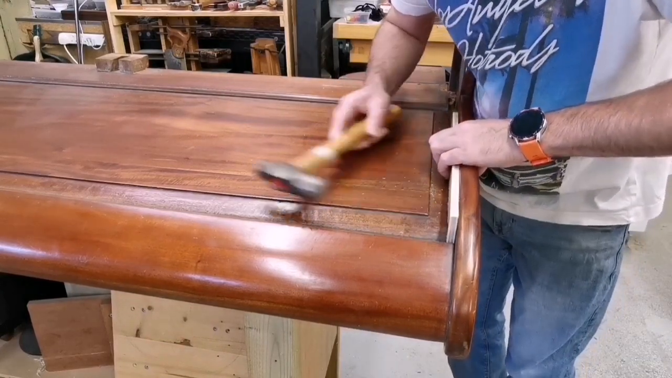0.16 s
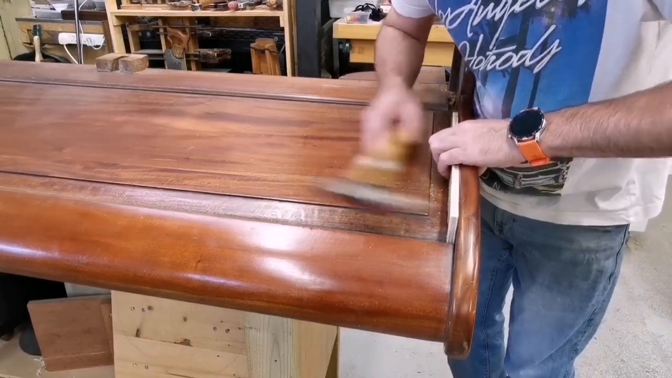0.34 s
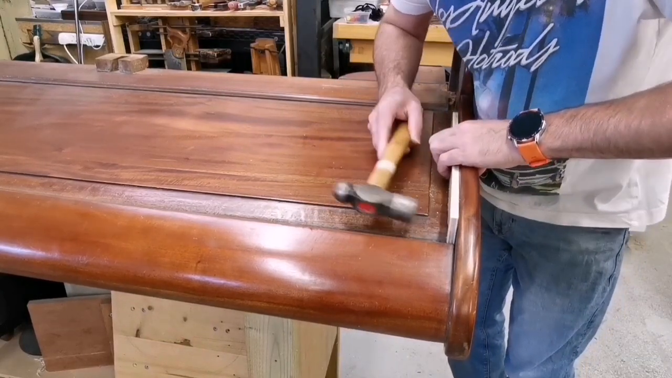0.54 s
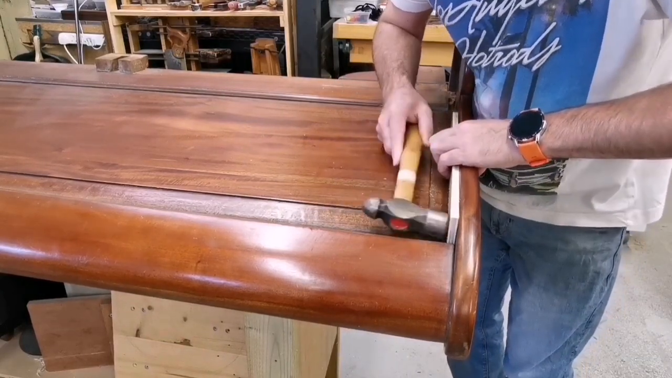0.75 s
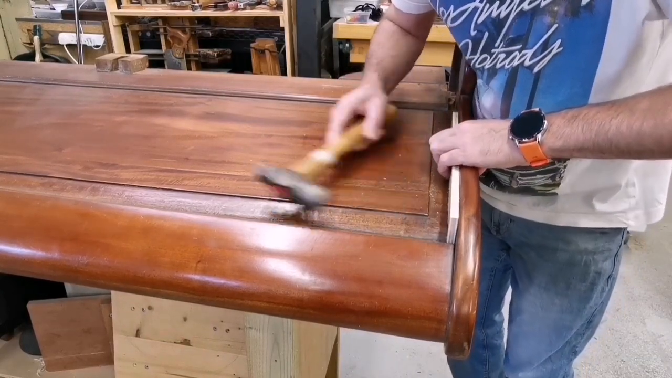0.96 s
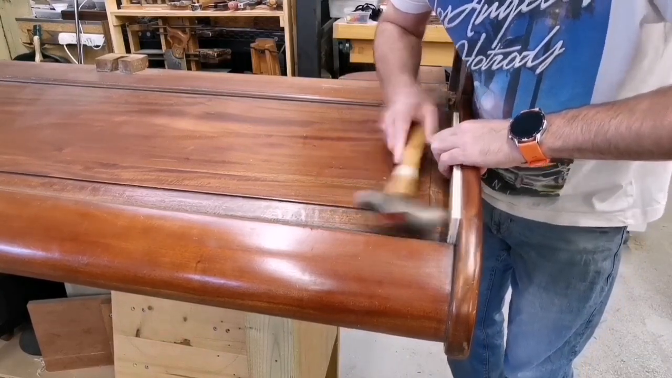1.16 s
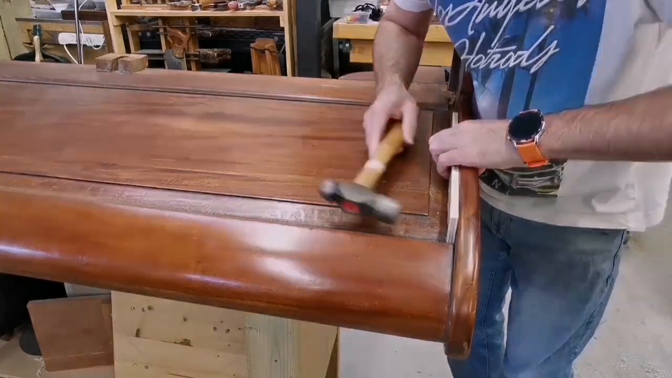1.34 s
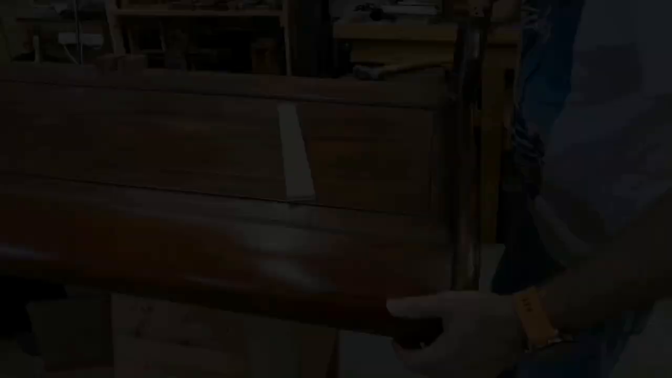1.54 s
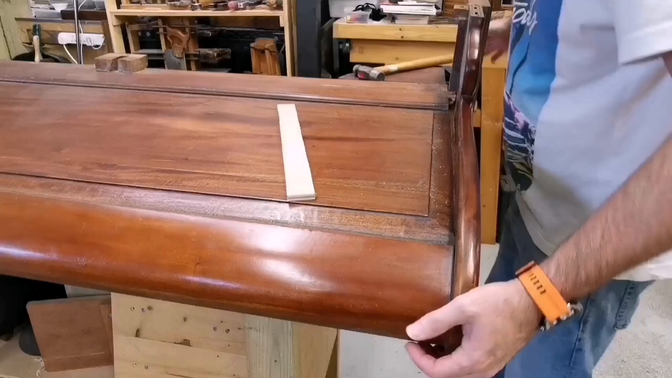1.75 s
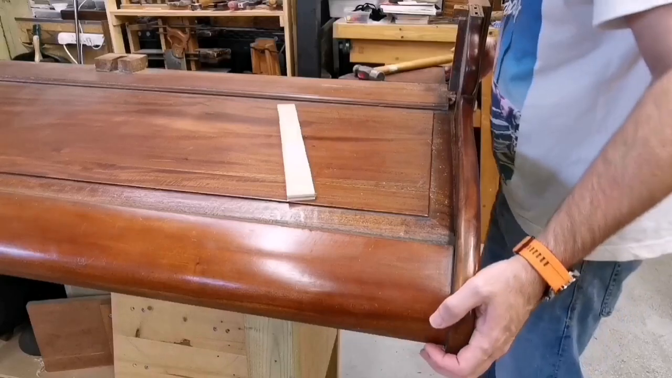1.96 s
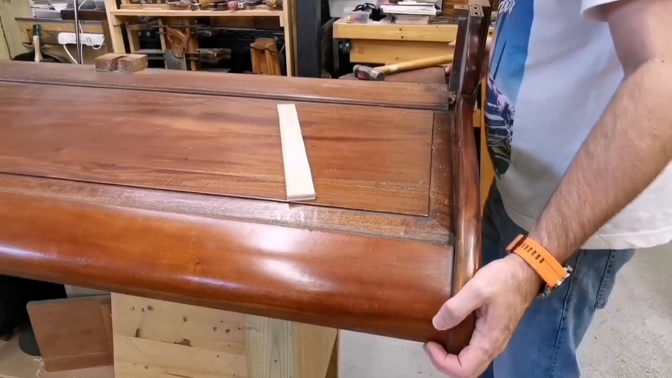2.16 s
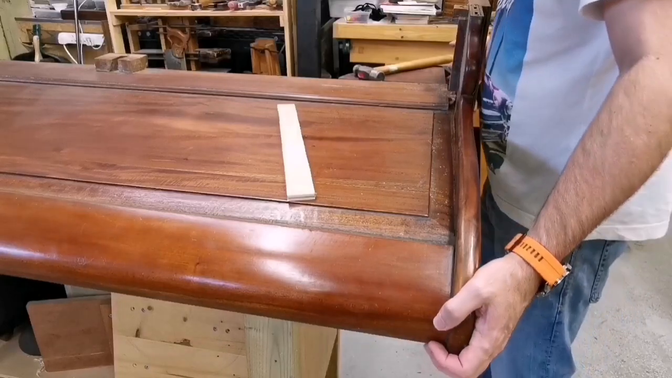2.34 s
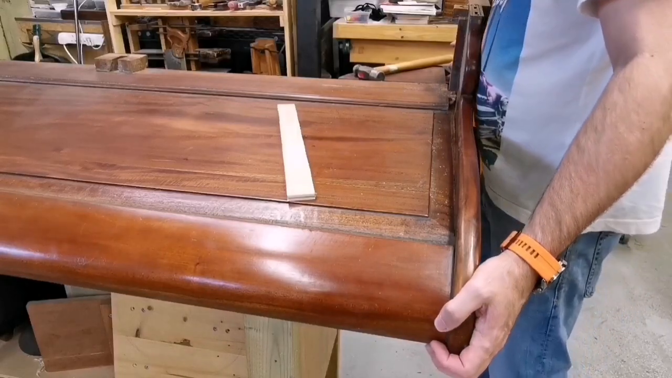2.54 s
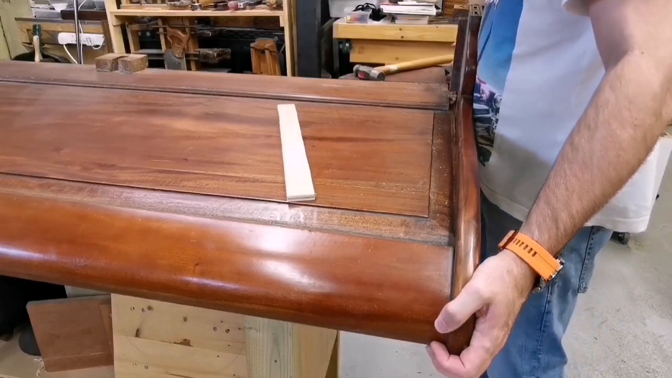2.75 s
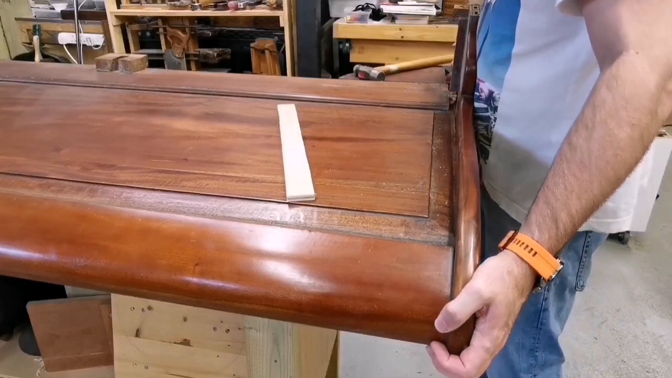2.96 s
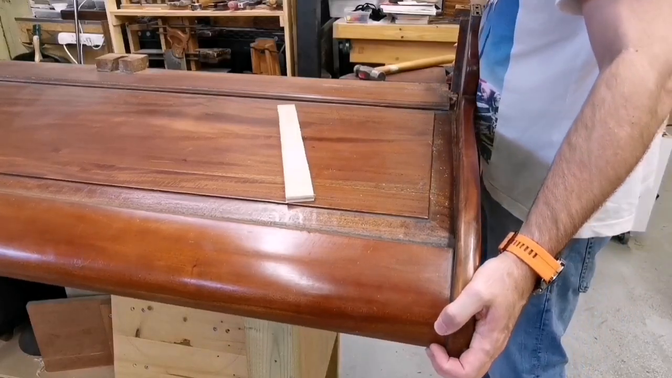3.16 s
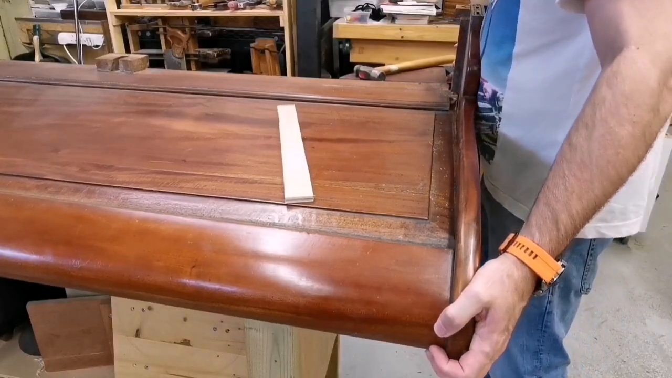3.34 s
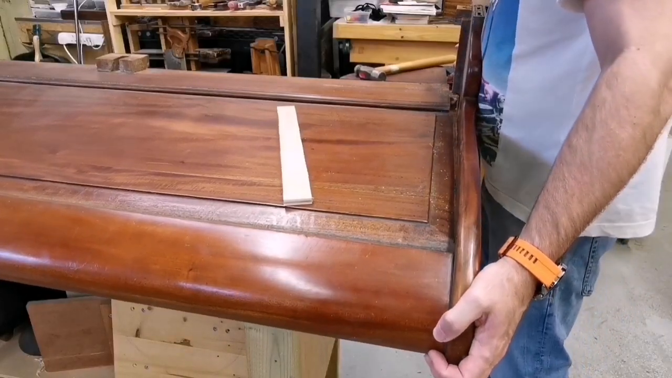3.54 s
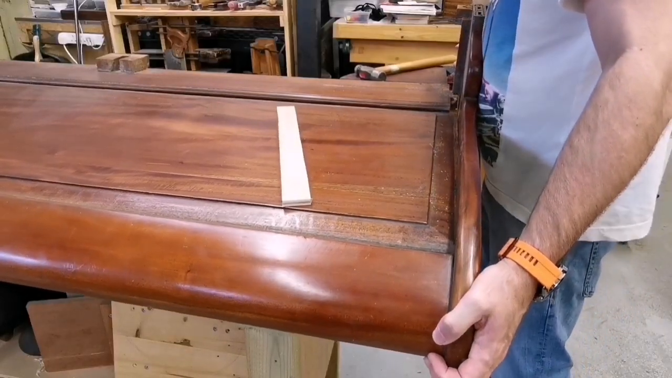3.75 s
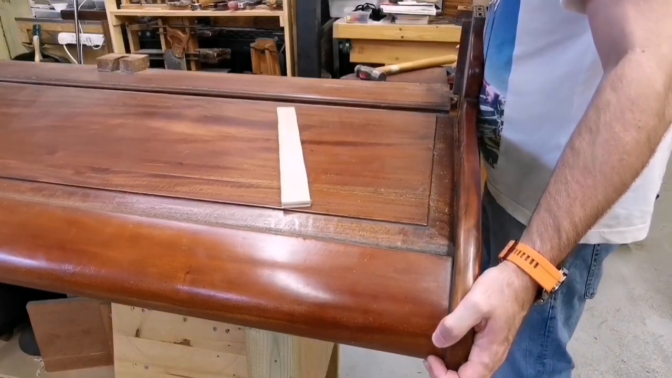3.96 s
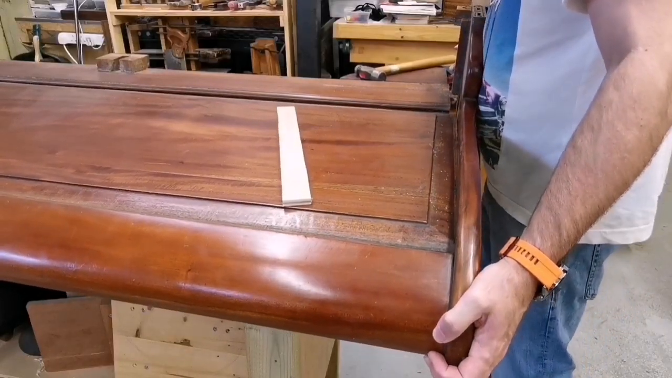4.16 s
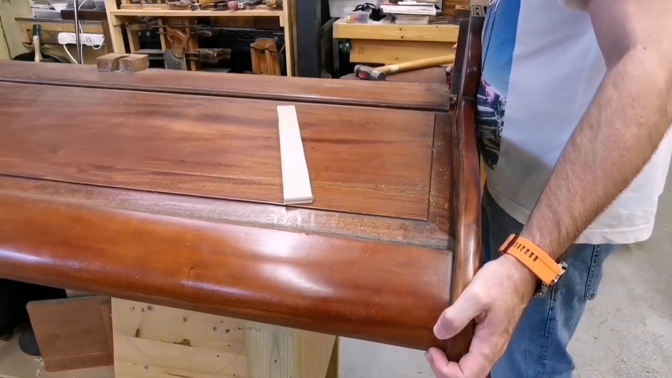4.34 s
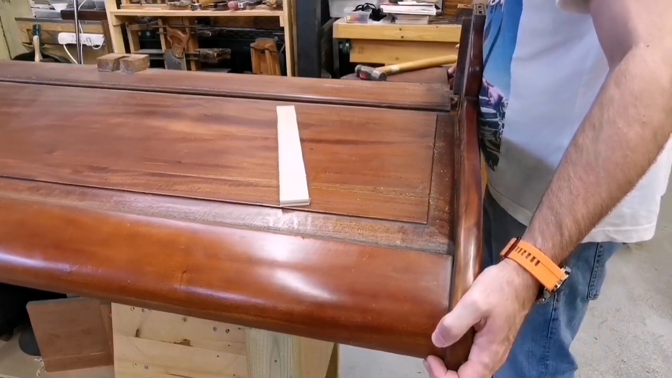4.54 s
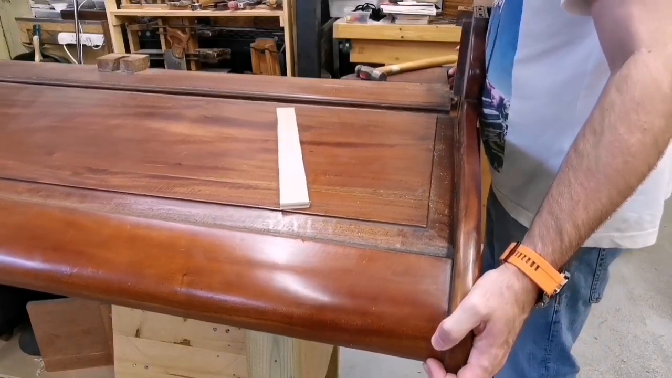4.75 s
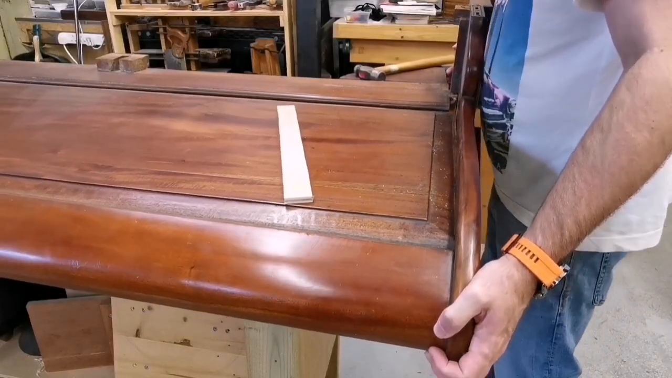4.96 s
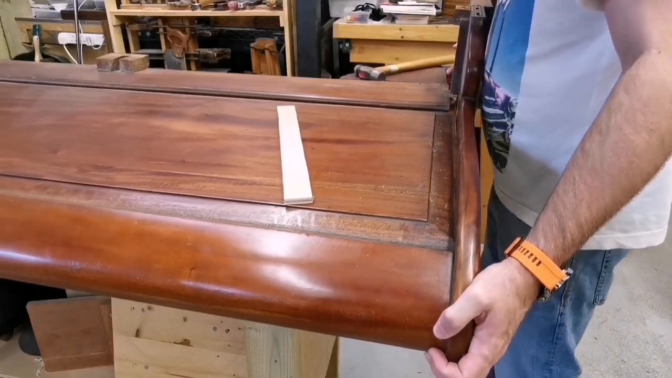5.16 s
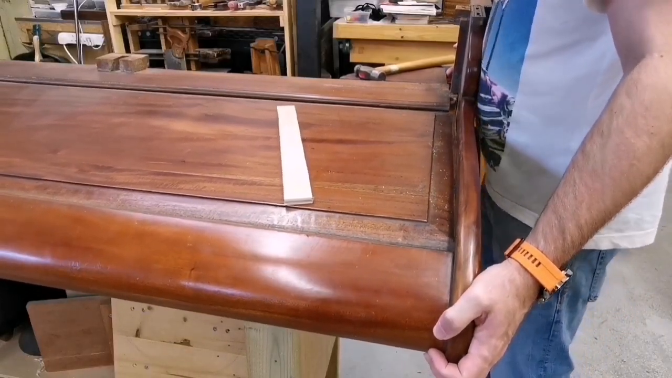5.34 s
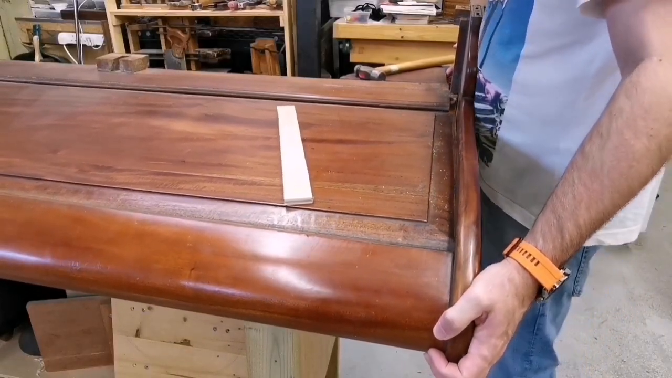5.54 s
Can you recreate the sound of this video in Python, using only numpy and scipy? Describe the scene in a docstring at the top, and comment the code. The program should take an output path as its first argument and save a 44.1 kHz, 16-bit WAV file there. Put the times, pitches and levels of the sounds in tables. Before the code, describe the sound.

In a hard-walled workshop, a steel hammer hits a wooden bed end in loud, cracking blows with quick bounces, rattle and low boom. The sound cuts out briefly, then returns much quieter: low rumble, hand rubbing and shuffling on wood, small clicks, and dull knocks from the joint that grow denser and louder toward the end. Close stereo microphone, with loud hits squashed by limiting.

```python
"""Hard hammer blows with bounces ring out first: steel on a wooden bed end, in a hard-walled workshop.
Each blow rings the wood, cracks, rattles and booms the bed; a limiter ducks the loud sound.
The sound cuts out, then resumes closer to the room's rumble. A hand rubs and grips the wood, made from
tiny clicks and soft noise, among dull knocks of the slipping joint and bright clicks, scrapes and cracks."""
import sys
import numpy as np
from scipy import signal
from scipy.fft import rfft, irfft, next_fast_len
from scipy.io import wavfile
from scipy.ndimage import uniform_filter1d, minimum_filter1d, map_coordinates

SR = 44100
rng = np.random.default_rng(int(sys.argv[2]) if len(sys.argv) > 2 else 0)


def bounce(signal):
    """Save signal as a 16-bit WAV file at the path given by the first command-line argument."""
    frames = np.transpose(np.atleast_2d(signal))
    limited = np.clip(frames, -1, 1)
    pcm = np.round(limited * 32767).astype(np.int16)
    wavfile.write(sys.argv[1], SR, pcm)


N = 246959
T = np.arange(N) / SR
PRE = SR // 4  # samples of run-up, so a blow just before time zero can still ring
CUT_S = 1.697  # hammering before this time, handwork after it


def from_db(db):
    """Turn decibels into a gain."""
    return 10 ** (np.asarray(db) / 20)


def rms_one(x):
    """Scale a sound to rms 1."""
    return x / np.sqrt(np.mean(x ** 2) + 1e-20)


def curve(rows):
    """Read a (time_s, value) table at every sample."""
    return np.interp(T, *np.transpose(rows))


def at_hz(points, hz):
    """Read a (pitch_hz, value) table on a log-pitch axis."""
    table_hz, values = np.array(points).T
    return np.interp(np.log(hz + 1), np.log(table_hz), values)


def colour(x, gain):
    """Filter a sound by a gain given as a function of pitch in Hz."""
    size = next_fast_len(x.shape[-1] + 4096)
    spectrum = rfft(x, size) * gain(np.fft.rfftfreq(size, 1 / SR))
    return irfft(spectrum, size)[..., :x.shape[-1]]


def stereo_noise(size, alike):
    """White noise whose two sides are as alike at each pitch as the table says."""
    mid, side = rng.standard_normal((2, size))
    mid = colour(mid, lambda hz: np.sqrt(1 + np.clip(at_hz(alike, hz), -1, 1)))
    side = colour(side, lambda hz: np.sqrt(1 - np.clip(at_hz(alike, hz), -1, 1)))
    return np.array([mid + side, mid - side]) / np.sqrt(2)


def uneven(size, step, depth_db, top):
    """A gain that jumps at random every few samples; top limits the upward jumps."""
    jumps = np.clip(rng.standard_normal(size // step), -3, top)
    return np.repeat(from_db(depth_db * jumps), step)


def patchy(x, depth_db):
    """Make the colour vary in small patches of pitch and time, fully above 1 kHz and less below."""
    patch_hz, patch_s = 300, .025
    f, t, z = signal.stft(x, SR, nperseg=512)
    coarse = rng.standard_normal((int(f[-1] / patch_hz) + 2, int(t[-1] / patch_s) + 2))
    places = np.meshgrid(f / patch_hz, t / patch_s, indexing="ij")
    field = map_coordinates(coarse, places, order=1)
    gain = from_db(depth_db * field * np.clip(f / 1000, 0, 1)[:, None])
    return signal.istft(z * gain, SR, nperseg=512)[1][..., :x.shape[-1]]


# how alike the two sides of the air noise are: pitch_hz, likeness (-1 to 1)
AIR_ALIKE = [(60, 0.77), (130, 0.96), (290, 0.85), (640, 0.00043), (1410, -0.27), (3100, -0.81), (6820, 1),
             (15000, -0.0096)]


def air(spectrum, level_db):
    """Spread-out noise of a given colour and rms level."""
    noise = stereo_noise(N, AIR_ALIKE)
    return from_db(level_db) * rms_one(colour(noise, lambda f: from_db(at_hz(spectrum, f))))


# colour of the air during the hammering: pitch_hz, relative_level_db (per Hz)
HAMMERING_AIR = [(15, -47.5), (25, 27), (249, 7.5), (317, 9.5), (503, -35), (775, -20.5), (1130, -38.5),
                 (1890, 1.5), (2910, -8.5), (3920, -3), (8590, -13), (9320, -19), (16000, -15)]


def hammering_air():
    """Quiet, steady background noise under the blows."""
    return air(HAMMERING_AIR, level_db=-64.5)


# colour of the air during the handwork: pitch_hz, relative_level_db (per Hz)
HANDWORK_AIR = [(20, -43), (40, -3), (70, -5.5), (125, -16), (200, -17.5), (350, -22), (600, -24.5),
                (1000, -32.5), (2000, -33), (2600, -32.5), (3500, -38), (5000, -38.5), (6500, -39.5),
                (9000, -45.5), (11000, -40), (16000, -48.5)]


def handwork_air():
    """Background noise under the handwork, its colour shifting in small patches."""
    return patchy(air(HANDWORK_AIR, level_db=-61), depth_db=2.0)


def narrow(hz, width_hz):
    """Noise in a narrow resonance: a wavering tone, rms 1."""
    noise = rng.standard_normal(N)
    return rms_one(colour(noise, lambda f: 1 / (1 + (2 * (f - hz) / width_hz) ** 2)))


def wavering(hz, width_hz, steady):
    """A steady tone with narrow noise about it, rms 1."""
    tone = np.sin(2 * np.pi * hz * T + rng.uniform(0, 2 * np.pi))
    return rms_one(steady * tone + narrow(hz, width_hz))


# machine tones: pitch_hz, width_hz, level_db (before the tilt to the left)
HUM = [(98.7, 6.1, -64.5), (157, 5, -68), (318, 10, -74)]
# how the low rumble comes and goes: time_s, level_db (before the tilt to the left)
RUMBLE = [(1.7, -44), (1.73, -48), (2.08, -47), (2.19, -56), (2.65, -58.5), (2.74, -74), (3.1, -46),
          (3.4, -78), (3.53, -53.5), (4.36, -58), (4.41, -74), (4.5, -50), (4.68, -77), (4.98, -48),
          (5.14, -71), (5.18, -47), (5.54, -59), (5.6, -103)]


def machines():
    """A wavering rumble and hum from plant outside the room, stronger on the left."""
    rumble_hz, rumble_width_hz = 47, 5
    hum = sum(from_db(level_db) * wavering(hz, width_hz, steady=2.54) for hz, width_hz, level_db in HUM)
    rumble = from_db(curve(RUMBLE)) * wavering(rumble_hz, rumble_width_hz, steady=1.64)
    tilted = (hum + rumble) * from_db([[.9], [-.9]])
    # a fainter, wider part pushes opposite ways on the two sides
    opposed = from_db(curve(RUMBLE) - 25) * narrow(rumble_hz, 23.0) * [[1], [-1]]
    return tilted + opposed


# likeness of the room's two sides: pitch_hz, likeness (-1 to 1)
ROOM_ALIKE = [(60, 0.55), (130, 0.97), (290, 0.86), (640, 0.47), (1410, -0.47), (3100, 0.42), (6820, 0.81),
              (15000, -0.94)]
# time the room takes to fall 60 dB: pitch_hz, fade60_s
ROOM_T60 = [(80, 0.55), (250, 0.69), (600, 0.59), (1500, 0.74), (4000, 0.78), (8000, 0.51), (15000, 0.21)]
# colour of the room's tail: pitch_hz, relative_level_db
ROOM_COLOUR = [(60, -6), (150, 8.5), (300, 2), (700, 3), (1500, -1.5), (4000, -5), (8000, -15), (15000, -3)]


def workshop(x, room_db):
    """Direct sound plus a spread-out room tail that builds up and dies band by band."""
    build_s = 0.0011
    t = np.arange(SR) / SR
    white = [stereo_noise(SR, ROOM_ALIKE) for _ in range(2)]
    edges = 40 * 2 ** np.arange(0, 9.1, .5)
    tail = 0
    for k, (low, high) in enumerate(zip(edges, edges[1:])):
        hz = np.sqrt(low * high)
        half_octave = signal.butter(2, [low, high], "band", fs=SR, output="sos")
        band = signal.sosfilt(half_octave, white[k % 2])  # neighbouring bands are unrelated
        tail = tail + band * from_db(at_hz(ROOM_COLOUR, hz) - 60 * t / at_hz(ROOM_T60, hz))
    tail = tail * (1 - np.exp(-t / build_s))
    tail = from_db(room_db) * tail / np.sqrt(np.mean(np.sum(tail ** 2, axis=1)))
    echo = signal.fftconvolve(x.mean(axis=0)[None], tail, axes=1)[:, :N + PRE]
    return (x + patchy(echo, depth_db=3.0))[:, PRE:]


# thin panel of the bed end, colouring every crack and rub:
# pitch_hz, width_hz, level_db (over the direct sound)
PANEL = [(1166, 320, -5.5), (1576, 230, -6), (1835, 210, -1), (2157, 360, 3.5), (2447, 300, -0.5),
         (2890, 76, 0), (3400, 90, -9.5), (4165, 120, 0), (4840, 80, -2), (5725, 200, -0.5), (6280, 86, -2),
         (6770, 420, 2.5), (7260, 150, 1.5), (7940, 250, 1), (8730, 270, 2.5), (9280, 160, 5),
         (10600, 85, 7), (11500, 130, 5.5)]


def panel(f, detune):
    """Direct sound plus the panel's resonances; each contact may meet slightly shifted pitches."""
    hz, width_hz, level_db = np.array(PANEL).T[:, :, None]
    hz = hz * (1 + detune * rng.standard_normal(hz.shape))
    return 1 + np.sum(from_db(level_db) / (1 + 2j * (f - hz) / width_hz), axis=0)


# hand and body moving against the bed; rise and fall each span 20 dB:
# peak_s, skin_and_cloth_rub_db, dull_shuffle_db, rise_s, fall_s, wood_scrape_db
STROKES = [(1.76, -82, -55.5, 0.27, 0.6, -76.5), (1.924, -65.5, -63.5, 0.061, 0.16, -78),
           (2.181, -74, -66.5, 0.37, 0.2, -82.5), (2.29, -75, -62.5, 0.064, 0.071, -71),
           (2.415, -69, -72, 0.035, 0.085, -66.5), (2.459, -72, -68, 0.055, 0.078, -70),
           (2.785, -72, -59.5, 0.042, 0.16, -70.5), (2.965, -76, -71, 0.036, 0.087, -81),
           (3.01, -61, -58.5, 0.055, 0.059, -60), (3.03, -67, -60.5, 0.022, 0.077, -83),
           (3.14, -75, -70, 0.076, 0.19, -84), (3.3, -74.5, -62, 0.022, 0.15, -78),
           (3.375, -78, -68, 0.055, 0.066, -77), (3.414, -61.5, -71, 0.11, 0.14, -61.5),
           (3.645, -65, -66, 0.041, 0.076, -65), (3.679, -58, -60.5, 0.052, 0.07, -64),
           (3.71, -69, -61.5, .03, 0.082, -75), (3.869, -75, -78, 0.026, 0.051, -82),
           (3.95, -79, -68.5, 0.026, 0.29, -78), (4.077, -67, -90, 0.054, 0.052, -76),
           (4.154, -73.5, -82, 0.056, 0.058, -78), (4.429, -60, -56.5, 0.075, 0.035, -65),
           (4.57, -89, -51.5, 0.04, 0.13, -85), (4.65, -82, -52, 0.073, 0.081, -79),
           (4.74, -78, -56.5, 0.036, 0.29, -87), (4.96, -81, -57, 0.074, 0.34, -77),
           (5.029, -71, -48, 0.072, 0.45, -72), (4.84, -70, -61, 0.13, 0.11, -73),
           (5.36, -73.5, -77, 0.39, 1, -75)]


def strokes(column):
    """Each stroke swells to its peak and dies away, evenly in dB."""
    total = 0
    for row in STROKES:
        peak_s, rise_s, fall_s = row[0], row[3], row[4]
        away = np.maximum((peak_s - T) / rise_s, (T - peak_s) / fall_s)
        total = total + from_db(row[column] - 20 * away)
    return total


# colour of the dull shuffle: pitch_hz, relative_level_db (per Hz)
SHUFFLE_COLOUR = [(150, -2.5), (300, -1.5), (550, -4.5), (1000, -8), (2200, -24), (4000, -48)]


def shuffling():
    """Hand and body shuffle dully: soft noise that swells with each stroke."""
    return strokes(column=2) * air(SHUFFLE_COLOUR, level_db=0)


# colour of the rubbing before the panel: pitch_hz, relative_level_db (per Hz)
RUB_COLOUR = [(500, -10), (1200, -7.5), (2100, -4), (3700, 2), (5000, 5.5), (6700, 4.5), (9000, -5.5),
              (12000, -14.5), (16000, -5)]


def rubbing(per_s, lump_db):
    """Skin, cloth and wood catch in dense small clicks that come in lumps and sound through the panel."""
    split_hz = 3600
    out = 0
    for column, slope in [(1, -6), (5, 6)]:  # skin and cloth above the split, wood scrape below
        lumps = np.repeat(from_db(lump_db * rng.standard_normal(N // 150 + 1)), 150)[:N]
        grains = (rng.random(N) < per_s / SR) * rng.standard_normal(N) * lumps
        grains = colour(grains, lambda f: from_db(at_hz(RUB_COLOUR, f)) * panel(f, detune=0)
                        / (1 + ((f + 1) / split_hz) ** slope))
        out = out + rms_one(patchy(grains, depth_db=5.0)) * strokes(column=column)
    return np.pad(out, (PRE, 0))


# ringing tones of the bed end: pitch_hz, hammer_level_db, handwork_level_db,
# fade60_s (before ring length)
WOOD = [(99, 4, -9, 0.068), (155.6, -9.5, -3.5, 0.13), (212, -6.5, 0, 0.088), (263, 8, 11.5, 0.066),
        (307, 1.5, -1.5, 0.11), (355, -3, -7, 0.11), (393.6, 4, 4, 0.068), (447, -7.5, 1, 0.077),
        (463, -16, -12, 0.099), (530, -6, -11, 0.032), (560, -3, -1.5, 0.048), (596.6, -2.5, -4, 0.069),
        (690, 1, 2, 0.025), (810, 8.5, -2, 0.029), (740, -13, -6, 0.1), (911, -6.5, 2.5, 0.066),
        (1070, 13.5, 19, 0.023), (1320, 4, 9, 0.077), (1640, -4, 11, 0.022), (1950, -5, -9, .03),
        (2420, 2, -11, .03)]
# likeness of the board's two sides: pitch_hz, likeness (-1 to 1)
BOARD_ALIKE = [(60, 0.17), (130, 0.83), (290, 0.95), (640, 0.96), (1410, 0.03), (3100, 0.02), (6820, 0.91),
               (15000, 0.6)]


def strikes(events, spectrum, column, scatter, rattle_t60, grit_db, wood_lag, wide, clatter_db, edge):
    """Each contact rings the wood near its pitch and gives a gritty crack, then loose parts rattle."""
    hit_detune = .015  # random shift of the tones from hit to hit, as a share
    wood_delay_s = .0025  # the board answers after the contact
    panel_detune, rattle_top_hz = .02, 9000
    t = np.arange(SR // 3) / SR
    modes = np.array(WOOD).T[:, :, None]
    tuned_hz, mode_db, t60 = modes[0], modes[column], modes[-1]
    every_hz = np.arange(SR // 2)
    power = from_db(at_hz(spectrum, every_hz)) ** 2 * np.abs(panel(every_hz, detune=0)) ** 2
    unit = np.sqrt(np.mean(power))  # evens out the loudness of the crack colour
    dull_rattle = signal.butter(2, min(rattle_top_hz, SR / 3), fs=SR)
    out = np.zeros((2, N + PRE + len(t)))
    for (s, wood_db, centre_hz, spread, length, crack_db, crack_t60, rattle_db,
         rise, bottom_hz, top_hz) in events:
        at, swing = PRE + round(s * SR), wood_lag * rise

        # wood: tones near the loudest pitch are favoured
        hz = tuned_hz * (1 + hit_detune * rng.standard_normal(tuned_hz.shape))
        nearness = 1 / (1 + (np.log2(hz / centre_hz) / spread) ** 2) ** 2
        share = from_db(mode_db + rng.normal(0, 1.0, hz.shape)) * nearness
        phase = scatter * rng.standard_normal(hz.shape)  # less scatter gives one firmer thump
        # a long board reaches each side differently
        phase = phase + wide * hz / 1000 * rng.standard_normal((2, len(hz), 1))
        waves = np.cos(2 * np.pi * hz * (t - wood_delay_s - swing) + phase)
        ring = -np.sum(share * waves * from_db(-60 * t / (t60 * length)), axis=1)
        # the board swings up after the crack
        ring *= np.sin(np.pi / 2 * np.clip((t - wood_delay_s) / swing, 0, 1)) ** 2

        # crack and rattle share one gritty noise
        grit = stereo_noise(len(t), BOARD_ALIKE) * uneven(len(t), 30, grit_db, top=1.5)
        clatter = uneven(len(t), 210, clatter_db, top=1.6)  # loose parts touch unevenly
        rattle = grit * clatter * from_db(rattle_db - 60 * t / rattle_t60)
        rattle = signal.lfilter(*dull_rattle, rattle)
        crack = grit * from_db(crack_db - 60 * t / crack_t60)
        crack = colour((crack + rattle) * np.minimum(t / rise, 1),
                       lambda f: from_db(at_hz(spectrum, f)) * panel(f, panel_detune) / unit
                       / (1 + (f / top_hz) ** edge) / (1 + (bottom_hz / (f + 1)) ** 3))
        out[:, at:at + len(t)] += from_db(wood_db) * ring / np.abs(ring).max() + crack
    return out[:, :N + PRE]


# the joint slips and knocks: start_s, wood_db, loudest_wood_hz, spread_octaves, ring_length_times,
# crack_db, rise_s, crack_top_hz
KNOCKS = [(2.414, -49.5, 900, 0.31, 1.2, -60, .004, 2700), (2.438, -50, 596, 0.57, 0.76, -51, 0.0038, 2500),
          (2.782, -54, 1040, 0.43, 0.9, -56.5, 0.005, 3480), (2.808, -53, 507, 0.68, 0.71, -53, .008, 1496),
          (2.839, -53.5, 447, 0.46, 1.3, -65, .008, 1500),
          (3.423, -46, 146.5, 0.6, 0.85, -55, 0.0099, 8000),
          (4.45, -42.5, 457, 0.66, 1.3, -51, 0.0084, 2946),
          (4.544, -33.5, 464, 0.43, 1.03, -43, .011, 1080),
          (4.609, -33, 422, 0.28, 0.98, -34.5, 0.012, 1070), (4.638, -38, 450, 0.45, 0.59, -53, 0.011, 980),
          (4.700, -31.5, 454, 0.5, 0.65, -35, 0.01, 1130),
          (4.776, -41.5, 413, 0.54, 0.59, -41, 0.0078, 982),
          (4.808, -41, 486, 0.19, 1.2, -53.5, 0.0066, 995), (4.824, -37, 337, 0.23, 0.92, -43, 0.012, 1012),
          (4.835, -37, 99, 0.26, 2, -58.5, 0.0038, 800), (4.861, -37.5, 105, 0.35, 1.4, -71, 0.0126, 795),
          (4.891, -37.5, 110, .3, .8, -60, 0.0103, 800), (4.907, -26.5, 534, 0.51, 1, -43.5, 0.0097, 1160),
          (4.95, -45, 480, 0.58, 0.95, -44.5, 0.034, 2680),
          (5.002, -25, 580, 0.44, 0.77, -39.5, 0.0057, 2340),
          (5.018, -31, 610, 0.53, 0.75, -47, 0.00497, 2000),
          (5.037, -34.5, 510, 0.27, 1.1, -64, .009, 2030), (5.192, -32, 169, 0.36, 0.47, -36, 0.0079, 1200),
          (5.213, -17, 641, 0.59, 0.39, -36, 0.0021, 1700),
          (5.2205, -20, 480, 0.53, 0.86, -25, 0.0039, 2280),
          (5.228, -22.5, 1050, 0.36, 0.91, -37.5, 0.0029, 2440),
          (5.244, -26.5, 650, .3, 1.05, -44, 0.0053, 2000),
          (5.27, -37.5, 595, 0.42, 1.6, -42.5, 0.0101, 2200),
          (5.253, -35, 510, 0.42, 0.55, -59, 0.008, 1880),
          (5.459, -39.5, 410, 0.49, 0.82, -75, 0.0062, 1510)]
# bright clicks, scrapes and cracks, some as the rubbing hand catches:
# start_s, wood_db, crack_db, crack_fade60_s, crack_bottom_hz, crack_top_hz
BRIGHT_CLICKS = [(2.414, -68, -54.5, 0.43, 300, 3100), (3.642, -67, -47, 0.021, 4400, 8000),
                 (3.006, -68, -50, 0.042, 920, 8900), (3.03, -62, -52, 0.043, 897, 8000),
                 (3.415, -70, -43.5, .04, 1500, 7980), (3.673, -68, -44, 0.044, 1475, 8900),
                 (4.078, -79, -54, 0.034, 1210, 16040), (4.156, -77, -56.5, .03, 1805, 12060),
                 (4.429, -73, -40.5, 0.068, 1530, 12100), (4.435, -72.5, -35, 0.073, 900, 17500),
                 (4.44, -70, -34.5, 0.087, 896, 17500), (4.449, -72, -43.5, 0.37, 600, 17500),
                 (5.067, -41.5, -36, 0.27, 5800, 14200), (5.069, -65, -44.5, 0.63, 1140, 3500),
                 (5.433, -46.5, -38.5, 0.11, 306, 4200)]
# crack colour of the knocks and bright clicks: pitch_hz, relative_level_db (per Hz)
HANDWORK_CRACK = [(150, -62), (500, 13), (1000, -1), (2000, -2.5), (3500, -2.5), (6000, -5), (7800, -4),
                  (8800, -1.5), (9800, -5.5), (12000, -9.5), (16000, -4.5)]


def knocks_and_clicks():
    """The slipping joint knocks dully; bright clicks, scrapes and cracks join in, mostly noise."""
    knock_bottom_hz, knock_rattle_below_db = 200, 17.5
    knock_crack_t60_s = 0.15  # times the ring length
    click_wood_hz, click_spread_oct, click_rise_s, click_rattle_below_db = 436, 0.59, 0.0021, 22.5
    events = [(s, wood, hz, spread, length, crack, knock_crack_t60_s * length,
               crack - knock_rattle_below_db, rise, knock_bottom_hz, top)
              for s, wood, hz, spread, length, crack, rise, top in KNOCKS]
    events += [(s, wood, click_wood_hz, click_spread_oct, 1, crack, t60,
                crack - click_rattle_below_db, click_rise_s, bottom, top)
               for s, wood, crack, t60, bottom, top in BRIGHT_CLICKS]
    return strikes(events, HANDWORK_CRACK, column=2, scatter=1.28, rattle_t60=0.32, grit_db=3.0,
                   wood_lag=0.99, wide=0.92, clatter_db=4.0, edge=6.0)


# whole bed booming under a blow: pitch_hz, relative_level_db, fade60_s
FRAME = [(63.3, -10.5, 1), (90, -11, 0.54), (97, -10.5, 0.27), (146, -5, 0.35), (168, -3, 0.38),
         (48, -9, 0.42), (121, -8, 0.27), (210.1, -2, 0.25), (255.6, 1.75, 0.2)]


def boom(below_db, rise, wide):
    """The whole bed swings up after each blow and booms in low, fading tones."""
    t = np.arange(SR // 2) / SR
    hz, mode_db, t60 = np.array(FRAME).T[:, :, None]
    out = np.zeros((2, N + PRE + len(t)))
    for s, wood_db, *_ in BLOWS:
        at = PRE + round(s * SR)
        phase = rng.uniform(0, 2 * np.pi, hz.shape) + wide * rng.standard_normal((2, len(hz), 1))
        fade = from_db(mode_db + rng.normal(0, 1.5, hz.shape) - 60 * t / t60)
        rings = fade * np.sin(2 * np.pi * hz * t + phase)
        swell = np.minimum(t / rise, 1) ** 2
        out[:, at:at + len(t)] += from_db(wood_db - below_db) * rings.sum(axis=1) * swell
    return out[:, :N + PRE]


# high tones of the steel hammer head: pitch_hz, relative_level_db,
# fade60_s (the fade never begins, as the swell outlasts the sound)
HEAD = [(4120, -8, 0.0098), (5430, -2, 0.0083), (5870, -11, .02), (6480, -11, .03), (6680, -10, 0.05),
        (6820, -12, .04), (7380, -6, .02), (7800, -5, .009), (8740, -9.5, 0.03), (9230, -2, .012),
        (10760, -8, .008), (11500, -7, 0.0042)]


def hammer_head():
    """High steel tones swell in extremely faintly after each contact, practically unheard."""
    swell_share = .6  # of the crack bottom figure, taken as seconds
    right_db, wide_rad = -3.5, .6  # right over left; phase scatter between the sides
    t = np.arange(SR // 3) / SR
    hz, mode_db, t60 = np.array(HEAD).T[:, :, None]
    out = np.zeros((2, N + PRE + len(t)))
    for s, *_, crack_bottom, top_hz, tone_db in BLOWS:
        swell_s = swell_share * crack_bottom  # minutes long, so only its very start is played
        at, late = PRE + round(s * SR), t - swell_s
        phase = wide_rad * rng.standard_normal((2, len(hz), 1))
        fade = from_db(mode_db + rng.normal(0, 2.5, hz.shape) - 60 * np.maximum(late, 0) / t60)
        rings = fade * np.sin(2 * np.pi * hz * late + phase)
        swell = np.minimum(t / swell_s, 1) ** 2
        out[:, at:at + len(t)] += from_db(tone_db) * rings.sum(axis=1) * swell
    return out[:, :N + PRE] * from_db([[-right_db / 2], [right_db / 2]])


# hammer blows and bounces; the first begins before time zero: start_s, wood_db, loudest_wood_hz,
# spread_octaves, ring_length_times, crack_db, crack_fade60_s, rise_s, crack_bottom_hz, crack_top_hz,
# steel_tone_db (before the very slow swell)
BLOWS = [(-.19, -4.5, 595, 0.74, 1.2, -2, 0.12, 0.00044, 292, 12750, -8),
         (.062, -40, 788, 0.9, 1.4, -37.5, 0.32, 0.0065, 303, 15200, -50.5),
         (.079, -15, 562, 0.62, 1.2, -16, 0.046, 0.0038, 1500, 12800, -26.5),
         (.085, -20.5, 700, 0.56, 2.1, -18, 0.1, 0.0016, 600, 11800, -27),
         (.182, -23.5, 567, 0.83, 1.2, -26, 0.11, 0.0037, 296.6, 5007, -50),
         (0.64, -3.5, 600, 0.76, 0.66, -2.5, 0.065, 0.0035, 892, 17420, 0),
         (0.65, -11.5, 1153, 0.43, 0.4, -19, 0.038, 0.0018, 885, 9000, -30.5),
         (0.657, -22.5, 1165, 0.67, 1, -11, 0.14, 0.00047, 300, 12130, -17),
         (.665, -29.5, 593, 0.48, 0.79, -20.5, 0.069, 0.0027, 1940, 10930, -16.5),
         (0.898, -15.5, 617.6, 0.31, 0.87, -17, 0.028, 0.002, 1900, 7880, -30),
         (.912, -25.5, 684, 0.43, .8, -25, 0.15, 0.0031, 1730, 3000, -50),
         (0.923, -24.5, 400, 0.55, 0.64, -29.5, 0.066, 0.0047, 300, 3000, -47),
         (.966, -23, 624, 0.65, 0.68, -29, 0.3, 0.0031, 880, 4034, -52.5),
         (1.450, -7, 584.5, 0.36, 0.56, -4.5, 0.052, 0.0015, 1500, 16140, -7),
         (1.456, -16.5, 787, 0.36, 0.75, -14, 0.11, 0.0017, 2000, 9000, -18),
         (1.461, -10, 917, 0.35, 1.5, -7, 0.064, 0.0042, 307.5, 9000, -25),
         (1.477, -15.5, 394.6, 0.66, 1.1, -28.5, 0.04, 0.0047, 2008, 7940, -25)]
# crack colour of the blows: pitch_hz, relative_level_db (per Hz)
CRACK = [(100, -42), (300, -5.5), (700, -1.5), (1300, -5), (2200, -10), (3700, -10.5), (5200, -7),
         (6600, -7), (9000, -10), (12000, -7.5), (16500, -12)]


def hammer_blows():
    """The hammer hits and bounces: each contact rings the wood, cracks and rattles loose parts."""
    rattle_below_db = 16  # under the crack
    events = [(s, wood, hz, spread, length, crack, t60, crack - rattle_below_db, rise, bottom, top)
              for s, wood, hz, spread, length, crack, t60, rise, bottom, top, _ in BLOWS]
    return strikes(events, CRACK, column=1, scatter=0.64, rattle_t60=0.52, grit_db=0.5,
                   wood_lag=0.91, wide=0.6, clatter_db=3.0, edge=4.4)


def scene():
    """Hammering before the cut, work by hand after it."""
    hammering = hammer_blows() + hammer_head() + boom(below_db=27.5, rise=0.0071, wide=0.25)
    before = workshop(hammering, room_db=-10) + hammering_air()
    handwork = knocks_and_clicks() + rubbing(per_s=2500, lump_db=1.0)
    after = workshop(handwork, room_db=-12.5) + handwork_air() + machines() + shuffling()
    return np.where(T < CUT_S, before, after)


LIMIT_DB = -22  # the limiter's threshold


def limiter(x, start_db):
    """Looks ahead, ducks a share of what exceeds the threshold and lets go at a steady rate."""
    ahead_s, share, release_db_s = .017, 0.66, 77  # release before the share is taken
    ahead = round(ahead_s * SR)
    level = 10 * np.log10(uniform_filter1d(np.mean(x ** 2, axis=0), 200) + 1e-12)
    level = -minimum_filter1d(-level, 2 * ahead + 1)  # loudest level nearby
    level = np.maximum(level, start_db - release_db_s * T)
    held = np.maximum.accumulate(level + release_db_s * T) - release_db_s * T
    excess_db = uniform_filter1d(np.maximum(held - LIMIT_DB, 0), 100)
    return x * from_db(-share * excess_db)


def gap():
    """Gain around the cut: a quick drop, a faint remnant, then a fade back in."""
    out_s, out_fall_s, back_s = 1.669, .004, .018
    linger_db, linger_db_per_s = -22, 750
    remnant = from_db(linger_db - linger_db_per_s * np.maximum(T - out_s - out_fall_s, 0))
    drop, back = 1 - (T - out_s) / out_fall_s, (T - CUT_S) / back_s
    return np.clip(np.maximum.reduce([drop, remnant, back]), 0, 1)


# tilt of the microphone pair: pitch_hz, left_minus_right_db
SHADE = [(60, -1), (130, 2), (290, 0), (640, -3.5), (1410, -1.5), (3100, -2), (6820, -1), (15000, -10.5)]


def record(dry):
    """Microphone shading, limiter on each side of the cut, the gap, a ceiling, the top cut off."""
    peak, cutoff_hz = .75, 16900  # ceiling of the converter; top of the sound
    pair = colour(dry, lambda f: from_db(at_hz(SHADE, f) / 2 * [[1], [-1]]))
    first = T < CUT_S
    limited = limiter(pair * first, start_db=-13.5) + limiter(pair * ~first, start_db=LIMIT_DB)
    capped = np.clip(limited * gap(), -peak, peak)
    return signal.sosfilt(signal.cheby2(16, 95, cutoff_hz, fs=SR, output="sos"), capped)


dry = scene()
out = record(dry)
bounce(out)
```